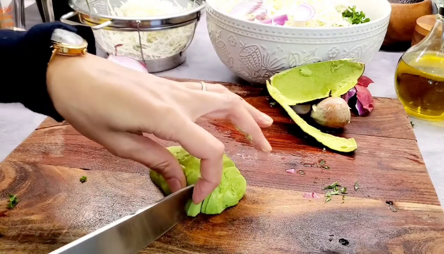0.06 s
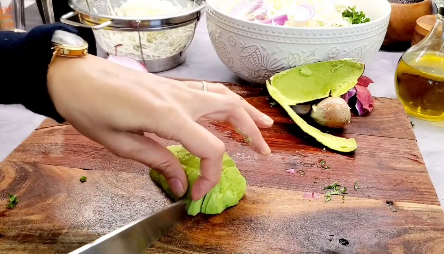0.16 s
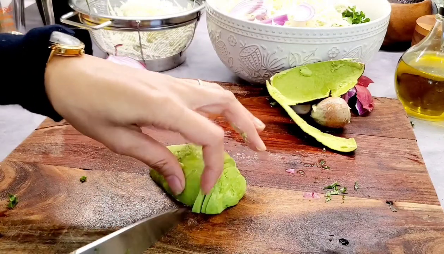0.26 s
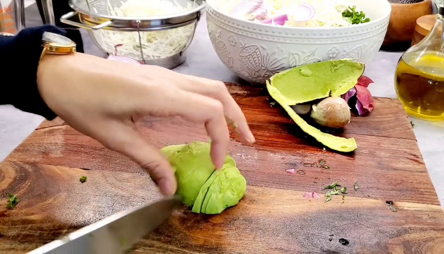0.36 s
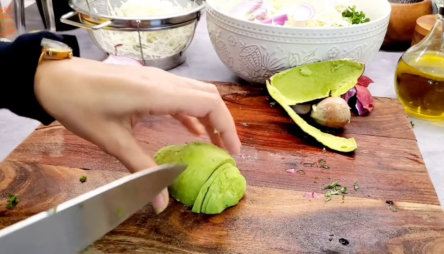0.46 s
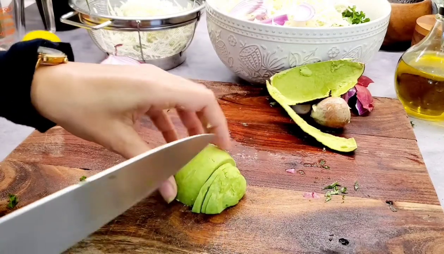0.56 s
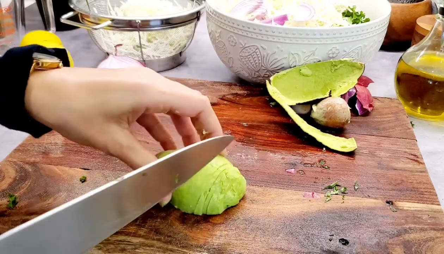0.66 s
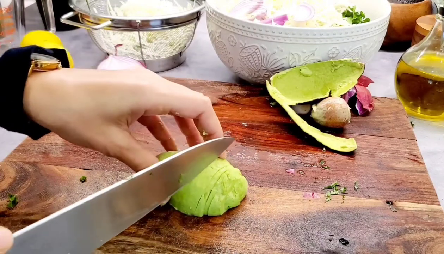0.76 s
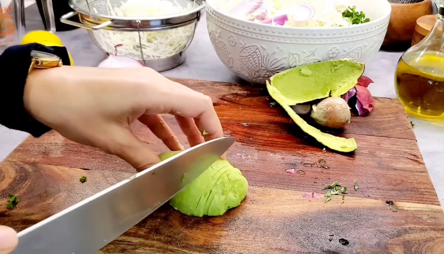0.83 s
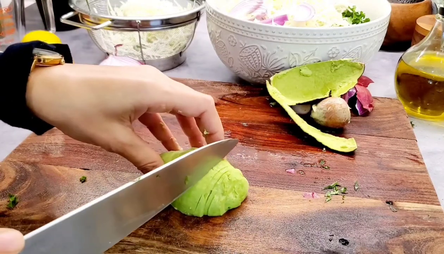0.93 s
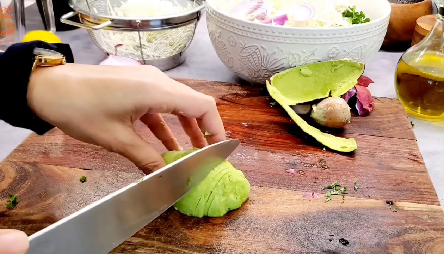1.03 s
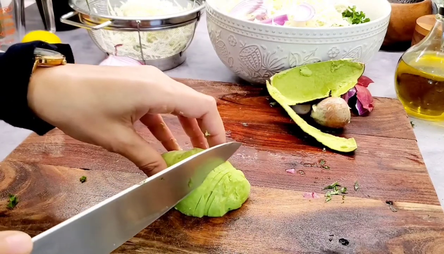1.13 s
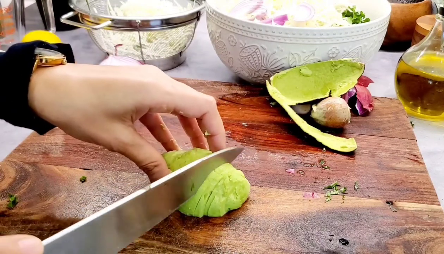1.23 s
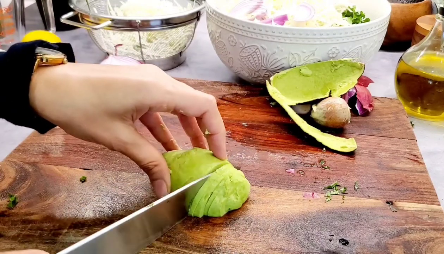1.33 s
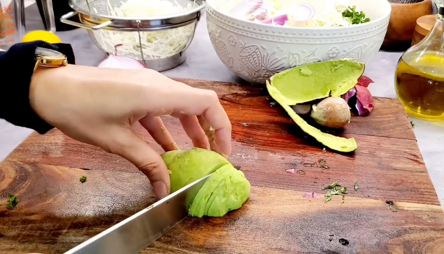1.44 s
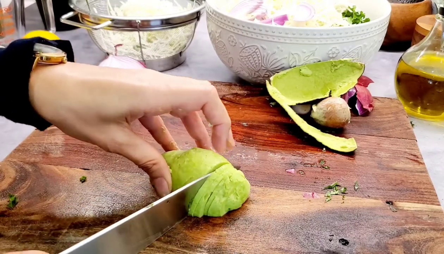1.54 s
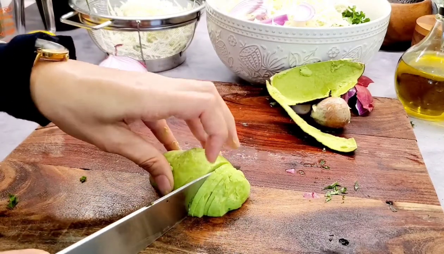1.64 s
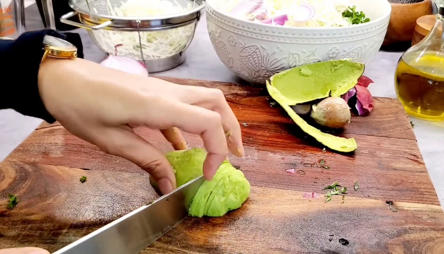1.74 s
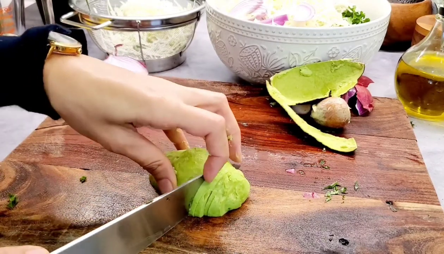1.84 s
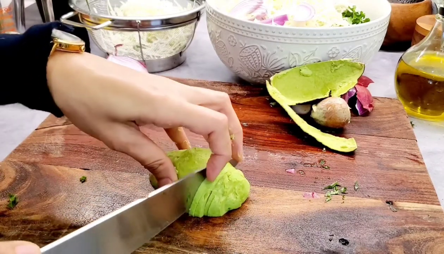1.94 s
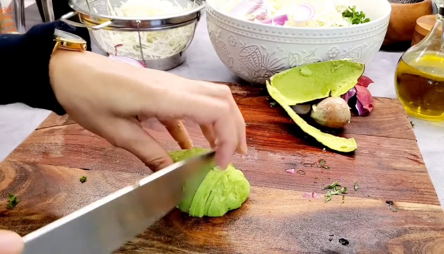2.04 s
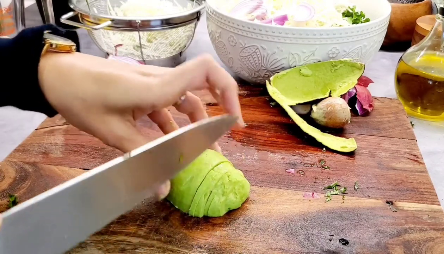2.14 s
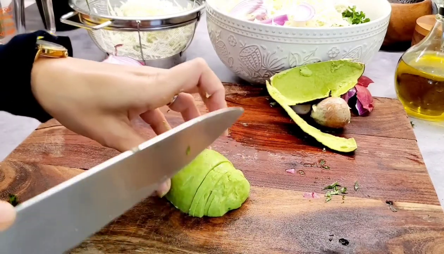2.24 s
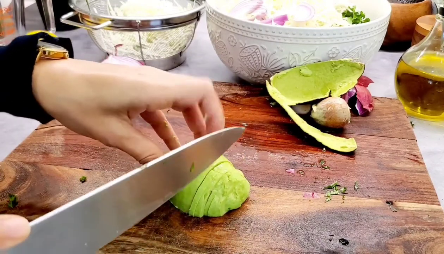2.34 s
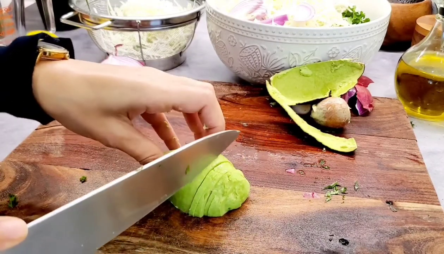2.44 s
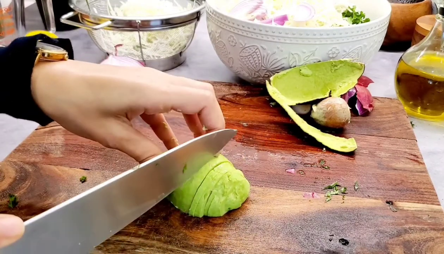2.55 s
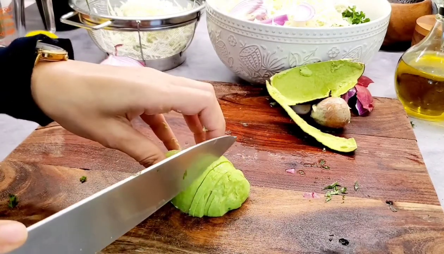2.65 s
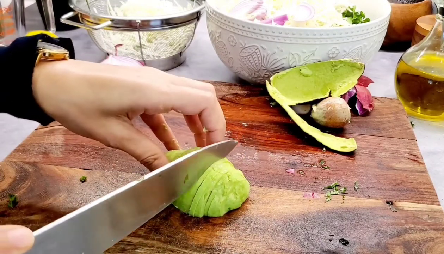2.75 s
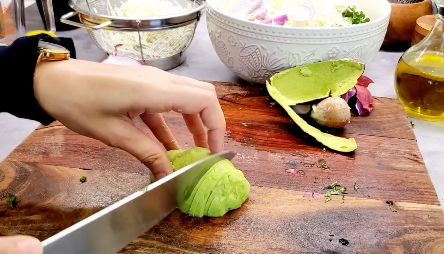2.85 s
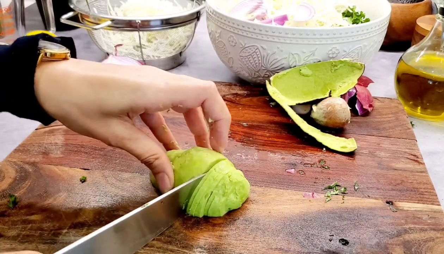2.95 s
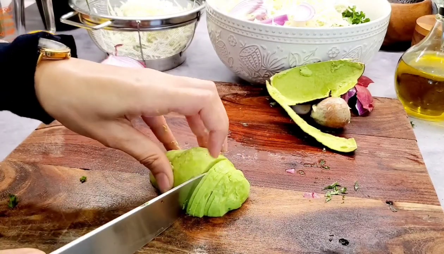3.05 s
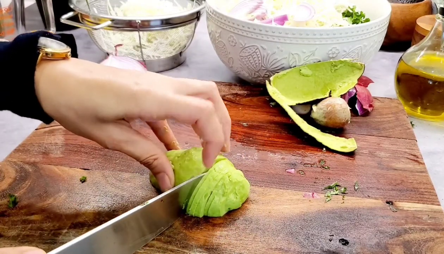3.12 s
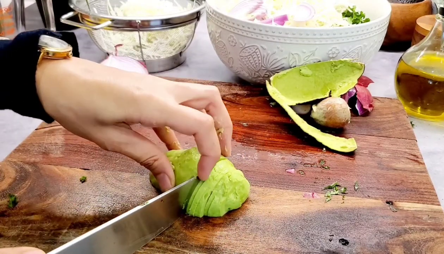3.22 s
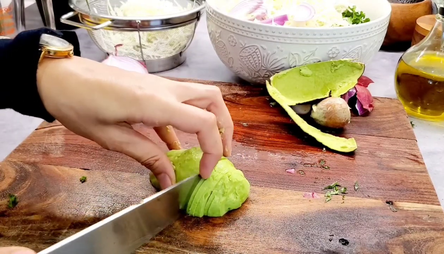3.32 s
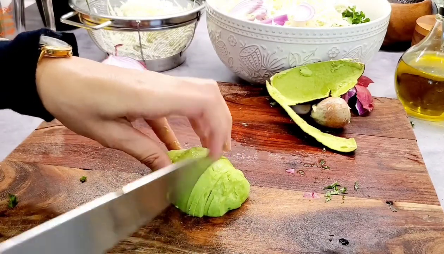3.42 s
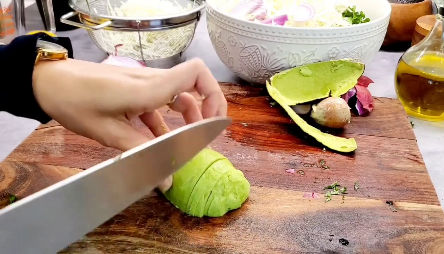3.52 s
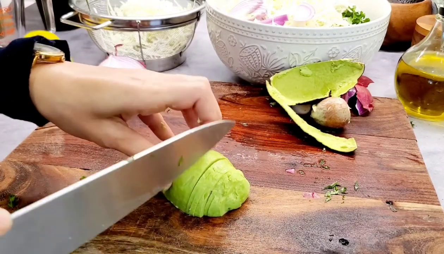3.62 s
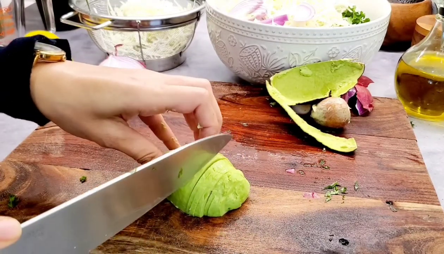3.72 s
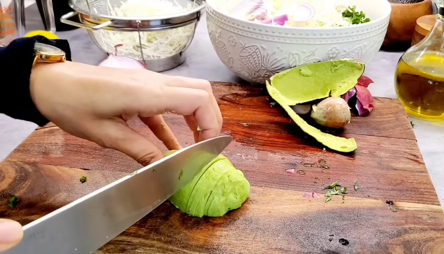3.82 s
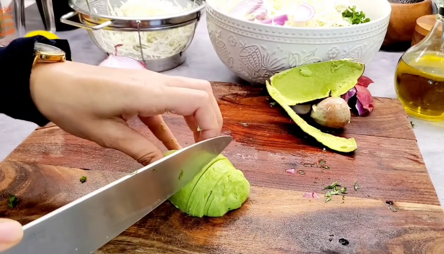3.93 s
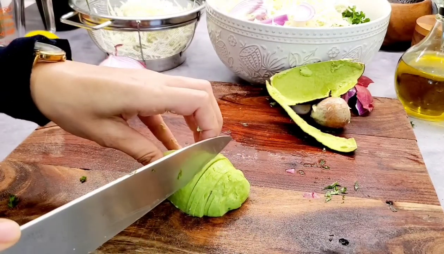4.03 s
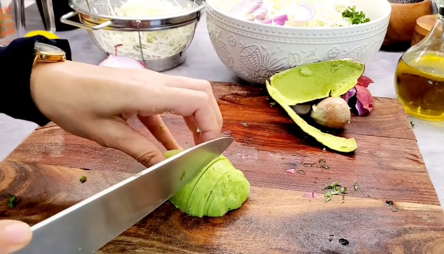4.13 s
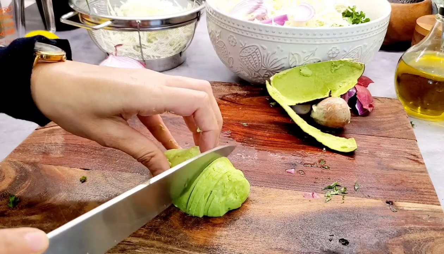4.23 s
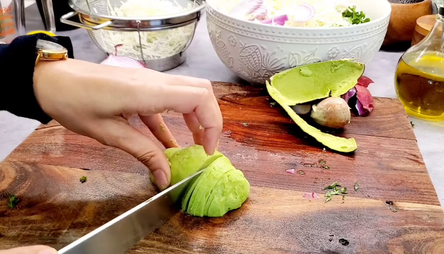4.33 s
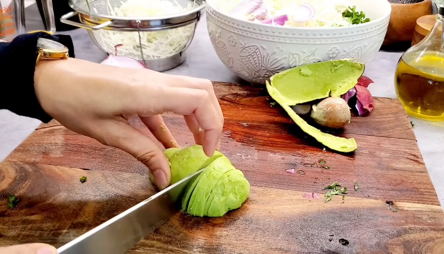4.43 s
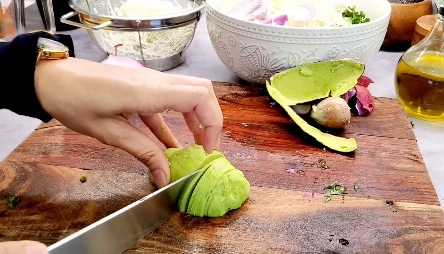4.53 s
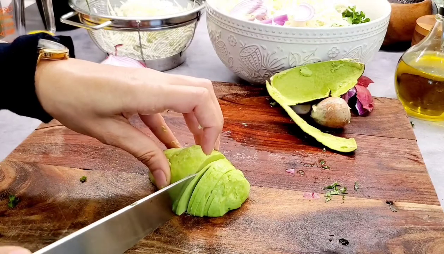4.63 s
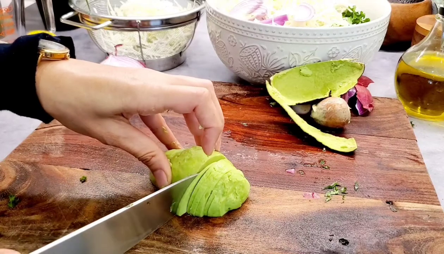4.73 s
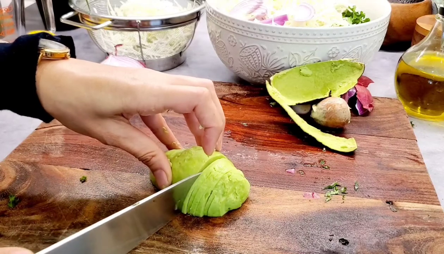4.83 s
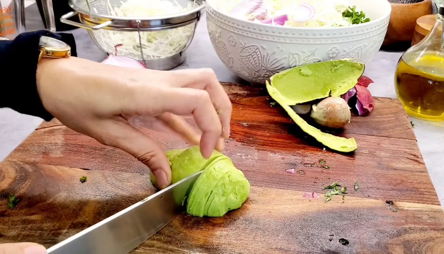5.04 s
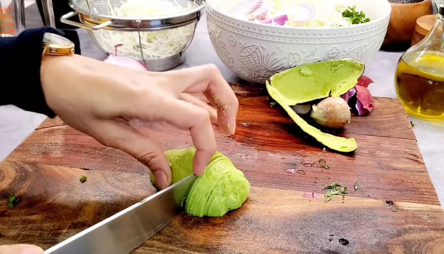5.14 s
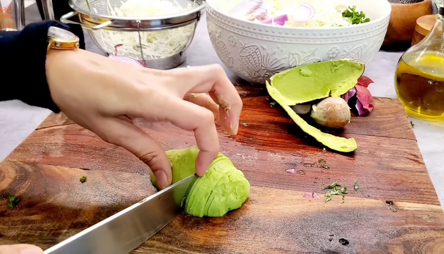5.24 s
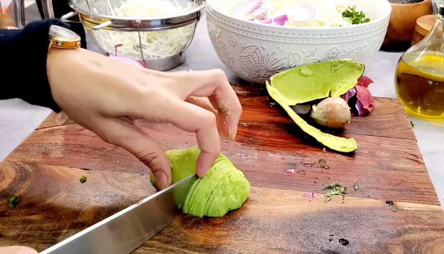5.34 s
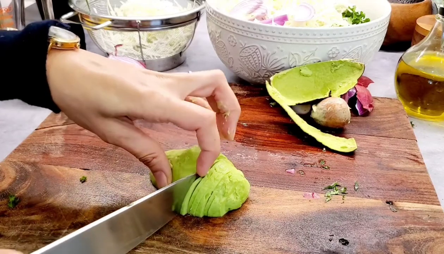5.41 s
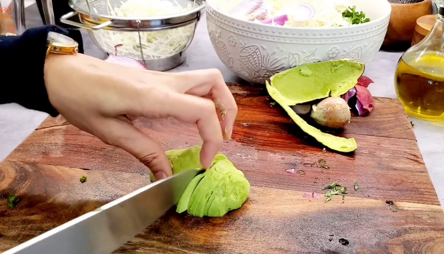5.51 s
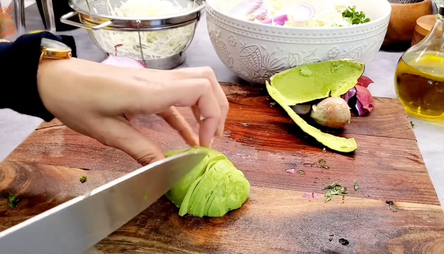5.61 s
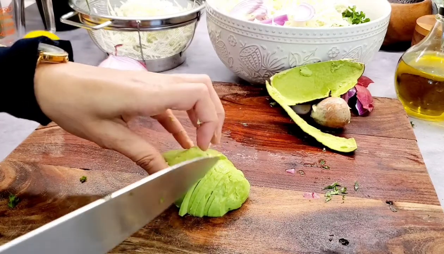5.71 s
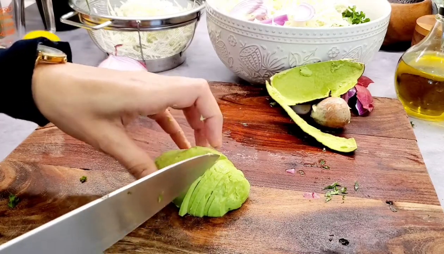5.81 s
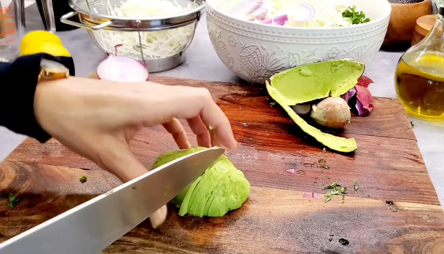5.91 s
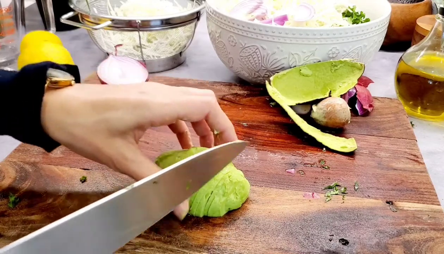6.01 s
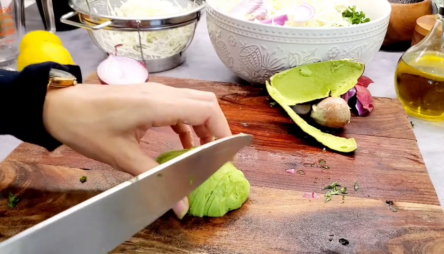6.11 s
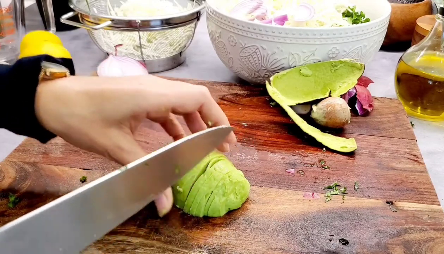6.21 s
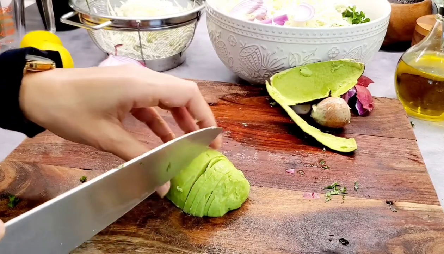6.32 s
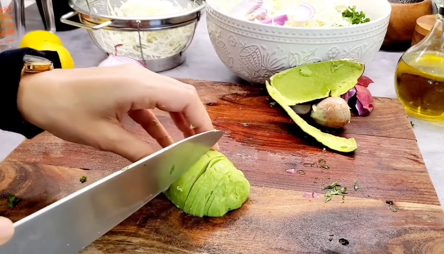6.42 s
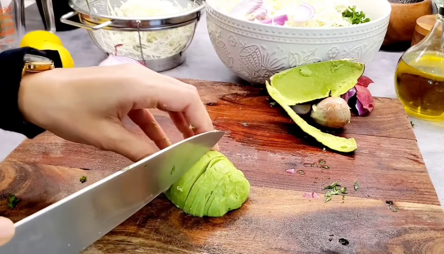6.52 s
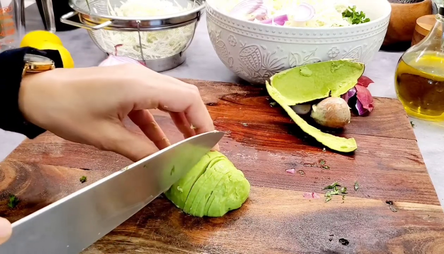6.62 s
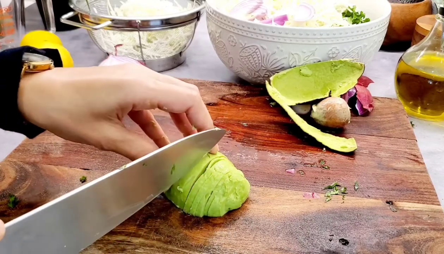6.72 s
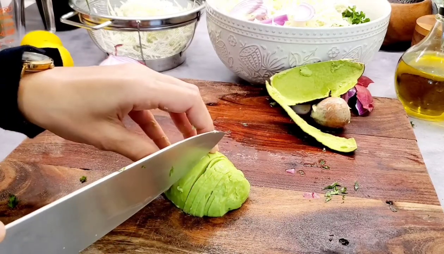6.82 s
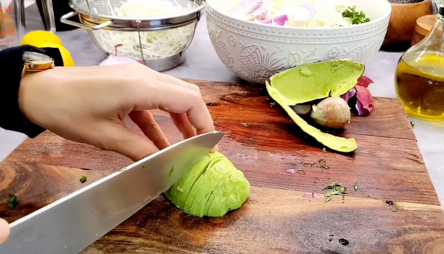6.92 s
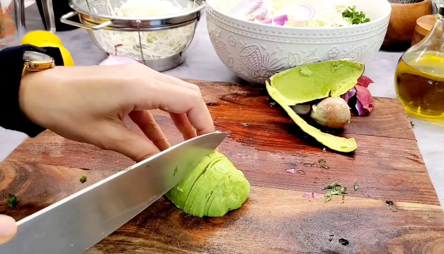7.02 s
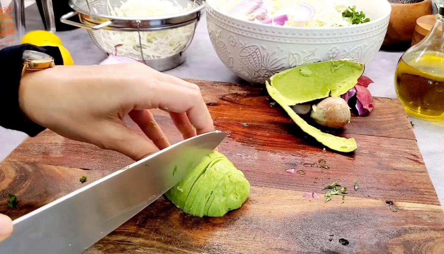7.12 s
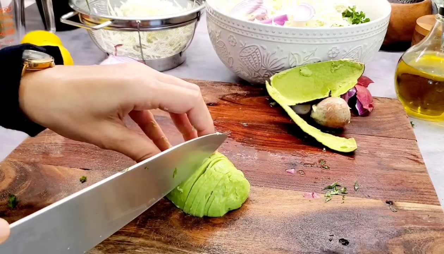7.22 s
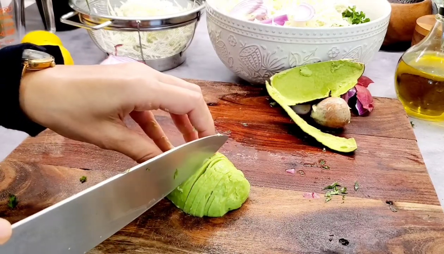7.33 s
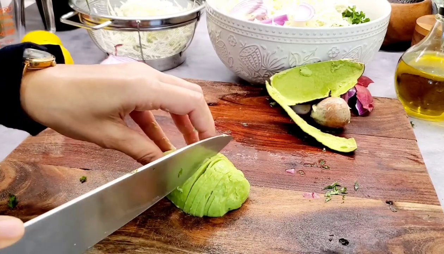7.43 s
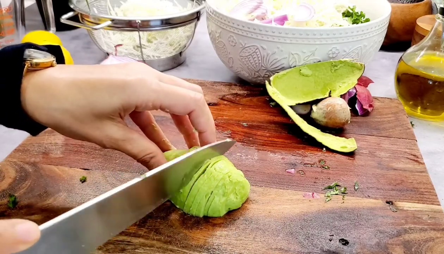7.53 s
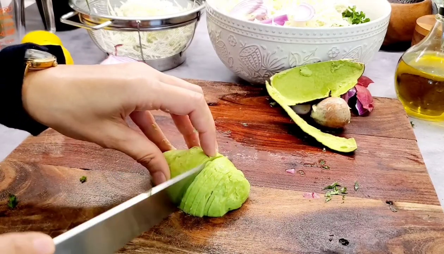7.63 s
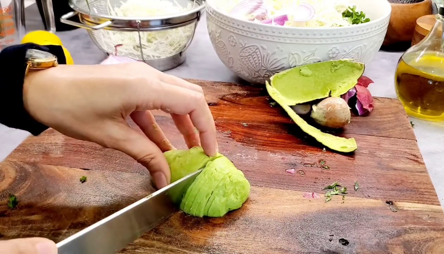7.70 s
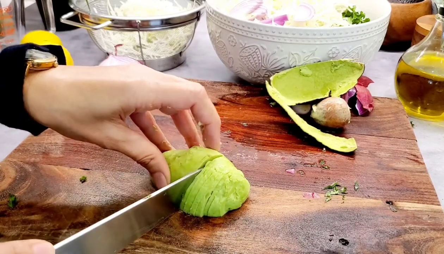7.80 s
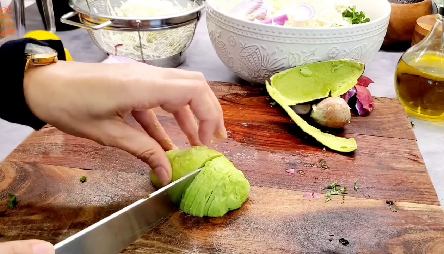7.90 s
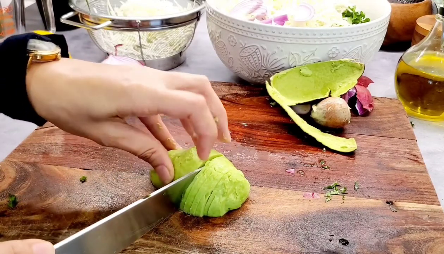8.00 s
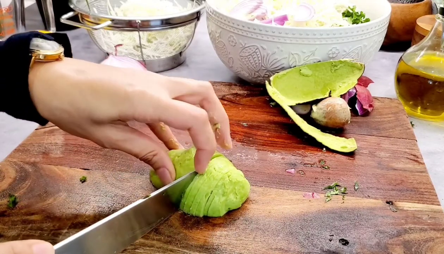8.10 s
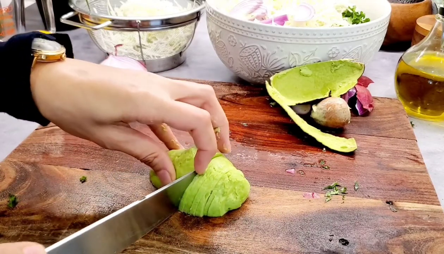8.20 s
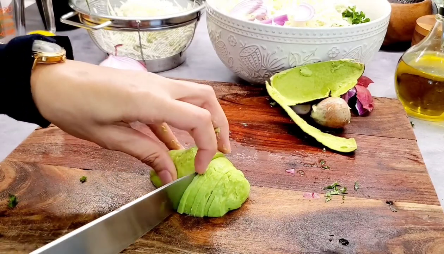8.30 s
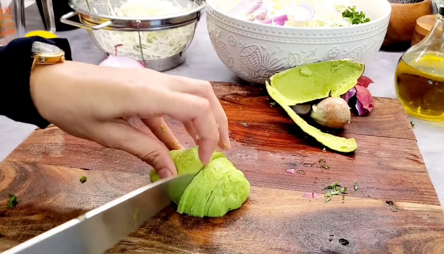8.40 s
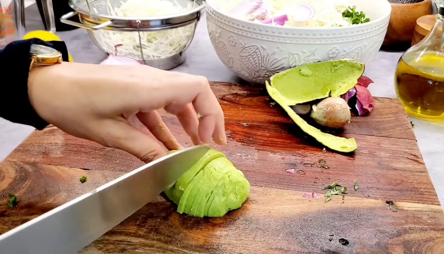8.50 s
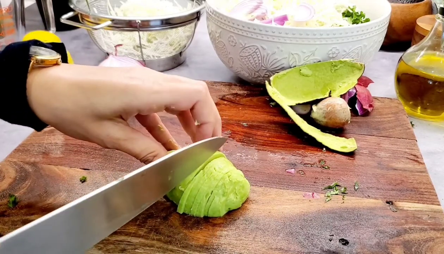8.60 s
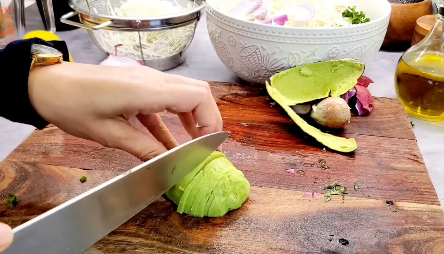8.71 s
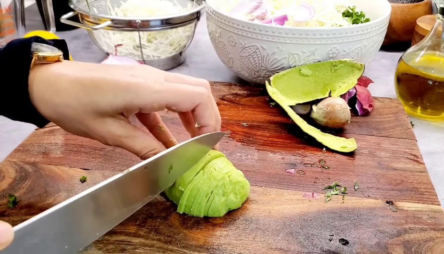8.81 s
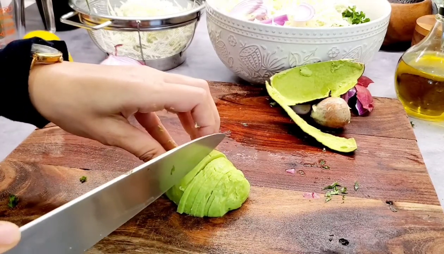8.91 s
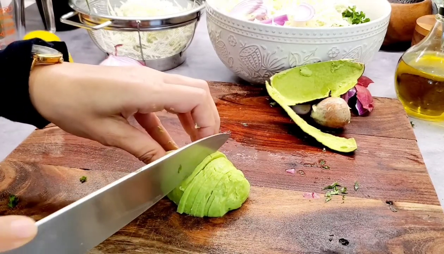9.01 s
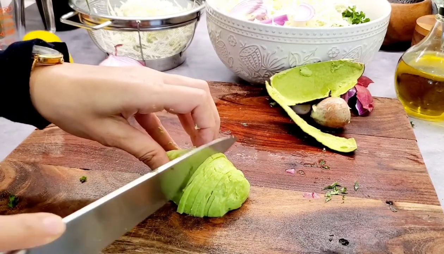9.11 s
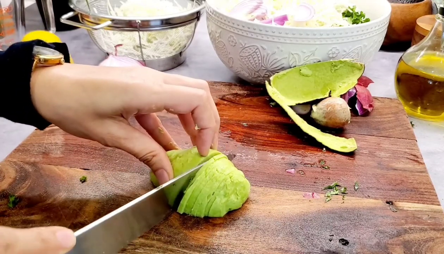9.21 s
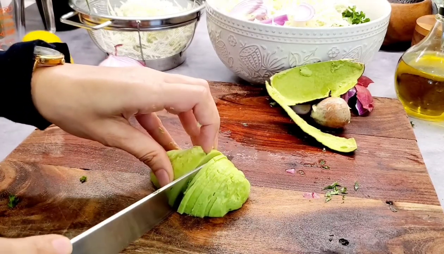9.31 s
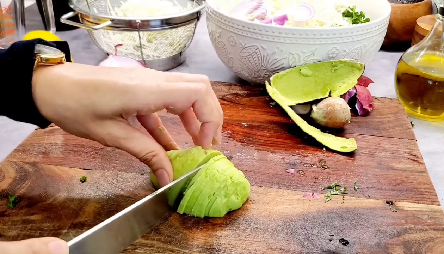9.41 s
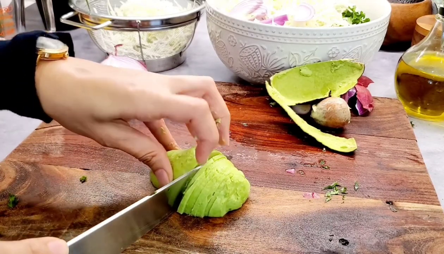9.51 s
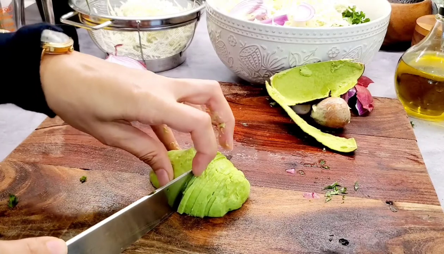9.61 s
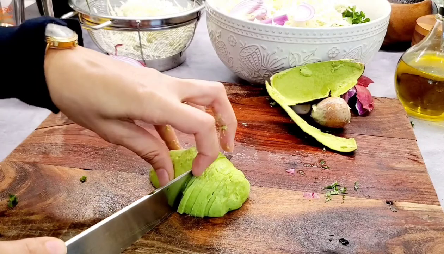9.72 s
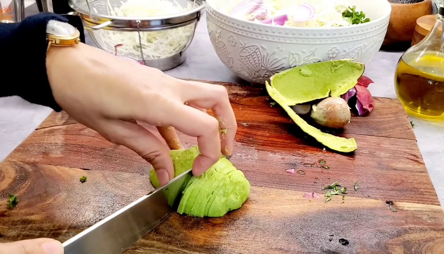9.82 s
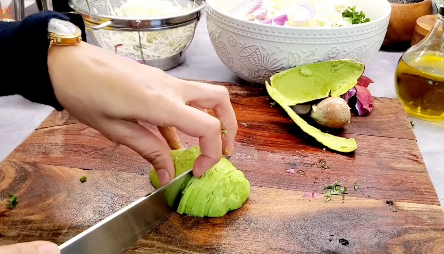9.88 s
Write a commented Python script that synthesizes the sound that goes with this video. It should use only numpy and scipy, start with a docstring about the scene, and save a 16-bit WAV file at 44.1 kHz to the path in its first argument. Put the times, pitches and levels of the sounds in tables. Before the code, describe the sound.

A kitchen knife cuts soft avocado on a wooden board, heard close up in stereo in a small kitchen. The edge scrapes lightly over the wood at the start, followed by a wet tick at 0.5 seconds and a faint moist rub. Short wooden knocks, each with a slight counter thump and a brief room echo, land at 1.4, 3.0 and 4.4 seconds, the second one the sharpest. The steel gives a faint thin ring at 2.2 seconds, and a moist slicing rasp leads into the third knock. From about 4.7 to 6.3 seconds a sleeve rustles in soft bursts, with a very light tap near 4.9 and another dull cut near 6.2. Two slightly softer knocks follow at 7.7 and 9.2 seconds. A quiet appliance hum with a faint whine and dull room noise continues throughout.

```python
"""Knife on a cutting board

A kitchen knife cuts soft fruit with moist friction and knocks on a wooden board, ringing board,
counter and steel in a small kitchen. The edge drags over the grain and ticks as it leaves the fruit;
a light touch rings the blade. A sleeve rustles in bursts. An appliance hums and whines under dull
room noise. Two spaced microphones."""
import sys
import numpy as np
from scipy import signal
from scipy.fft import rfft, irfft
from scipy.io import wavfile

SR = 44100
rng = np.random.default_rng(int(sys.argv[2]) if len(sys.argv) > 2 else 0)


def master_out(mix):
    """Clip the mix to full scale and print it as 16-bit PCM to the path in sys.argv[1]."""
    frames = np.transpose(np.atleast_2d(mix))
    ceiling = np.clip(frames, -1, 1)
    pcm = np.round(ceiling * 32767).astype(np.int16)
    wavfile.write(sys.argv[1], SR, pcm)


N = 438794
TIME_S = np.arange(N) / SR

# Wooden board: (frequency [Hz], left gain, right gain, t60 [s])
BOARD_MODES = [(371, -.04, -0.0075, 0.033), (582, -0.15, -0.13, 0.17), (609.6, -0.051, -.15, 0.075),
               (645, 0.1, 0.25, .055), (743, 0.12, 0.33, 0.083), (934.5, .27, -0.31, 0.014),
               (1057, .06, -0.54, 0.071), (1140, 0.82, 2.1, 0.0081), (1375, 0.6, 0.2, .015)]
# Stiff upper modes, woken by hard blows: (frequency [Hz], left gain, right gain, t60 [s])
UPPER_MODES = [(1570, 1.2, -0.26, .02), (2000, -0.69, -.6, 0.025), (2230, 0.99, -1.1, 0.014),
               (2375, -0.95, -1.2, 0.035), (2824, 0.76, 0.55, 0.011), (3440, -0.48, -0.41, 0.018),
               (3732, 0.14, .4, 0.033), (4379, -.08, 0.25, 0.0097)]
# Low bending modes of the blade: (frequency [Hz], left gain, right gain, t60 [s])
STEEL_MODES = [(1830, 0.97, .9, 0.075), (1855, 0.037, 0.11, 0.5), (2280, 0.15, 0.18, 0.066),
               (3983, 0.14, .1, 0.075), (4840, .03, 0.017, 0.068)]
# Snap of the edge: (frequency [multiple of centre], relative density [dB])
SNAP_SPECTRUM = [(.4, -20), (.7, -7.5), (1, 3.5), (1.4, -6), (2.2, -16), (3.0, -14)]


def impact(hardness_db, snap_db, snap_hz, contact_s, size):
    """One blow: the edge snaps, board and steel ring. A small board radiates no bass."""
    snap = stereo_noise(np.array(SNAP_SPECTRUM) * [snap_hz, 1], size)
    snap *= amp(snap_db) * decay(size, t60_s=0.018)
    board = strike(BOARD_MODES, size, contact_s)
    upper = amp(hardness_db) * strike(UPPER_MODES, size, contact_s=0.00023)
    steel = amp(5 + 1.29 * hardness_db) * strike(STEEL_MODES, size, contact_s=0.000067)
    low_cut = signal.butter(2, 300, "high", fs=SR, output="sos")
    return signal.sosfilt(low_cut, board + upper + steel) + snap


# Counter under the board: (frequency [Hz], left gain, right gain, t60 [s])
COUNTER_MODES = [(78, 1.8, 1.8, 0.14), (173, 0.68, 0.67, 0.03), (254.1, 0.54, 1.2, 0.023)]
# Early echoes off nearby surfaces and a far wall: (delay [s], left gain, right gain)
EARLY_ECHOES = [(.0012, -0.96, 0.28), (.0064, -0.058, .5), (.0112, .25, .3), (.018, -0.059, 0.18),
                (.0345, 0.049, .12)]
# Blade meets board:
# (time [s], level [dB], hardness [dB], relative snap [dB], snap centre [Hz], contact [s])
BOARD_KNOCKS = [(1.3916, -3.5, -21.5, -46.5, 8450, 0.00052), (2.9852, -4.5, -16.5, -42, 5280, 0.00041),
                (4.3673, -3.5, -24.5, -49.5, 7420, 0.00061), (4.9457, -25, -34, -48, 6000, 0.0018),
                (7.724, -6, -27.5, -51, 6800, 0.00075), (9.2479, -6, -33.5, -51.5, 5660, 0.00074)]


def knocks(thump_db=-40.5, thump_db_per_ms=7.5, rebound_s=0.021, rebound_db=-1.5):
    """Each blow shakes the counter, the board rocks back onto it, and the room answers."""
    out, size = np.zeros((2, N + SR)), SR // 3
    for time_s, level_db, hardness_db, snap_db, snap_hz, contact_s in BOARD_KNOCKS:
        blow = amp(level_db) * impact(hardness_db, snap_db, snap_hz, contact_s, size)
        thump = amp(thump_db_per_ms * contact_s * 1000) * strike(COUNTER_MODES, size, contact_s=0.0061)
        rebound = amp(rebound_db) * strike(COUNTER_MODES[1:], size, contact_s=0.003)
        counter_gain = amp(level_db + thump_db)
        add_at(out, time_s, blow + counter_gain * thump)
        add_at(out, time_s, counter_gain * rebound, rebound_s)
        for delay_s, left, right in EARLY_ECHOES:
            add_at(out, time_s, blow[0] * [[left], [right]], delay_s)
        burst = blow[:1] * decay(size, t60_s=0.012)  # mostly the first burst reaches the walls
        room = kitchen_response()  # new for each spot on the board
        add_at(out, time_s, signal.fftconvolve(room, burst, axes=1))
    return out[:, :N]


# Dull friction and rasp of the edge: (frequency [Hz], relative density [dB])
CUT_SPECTRUM = [(250, -32), (450, 2.5), (800, -4), (1250, -3), (1600, -15), (3000, -43.5)]
RASP_SPECTRUM = [(1200, -22.5), (1550, -3), (1900, 1), (2350, -9), (2800, -19.5), (3700, -18), (6000, -24),
                 (8500, -30), (10000, -53), (15000, -42.5)]
# Blade rubs fruit and wood: (time [s], hold [s], level [dB], relative rasp [dB])
CUT_STROKES = [(.7, .05, -60, -12.5), (4.21, .1, -51.5, -3), (4.345, .015, -53, -6.5),
               (6.225, .09, -54.5, -16)]


def cuts(rise_db_per_s=560, fall_db_per_s=350):
    """Moist friction: dull dense grains, with a finer rasp of the edge on top."""
    body = stereo(grains(per_s=9000, spread_db=3.5), CUT_SPECTRUM)
    rasp = stereo(grains(per_s=11000, spread_db=0), RASP_SPECTRUM)
    return sum(stroke(time_s, hold_s, db, rise_db_per_s, fall_db_per_s) * (body + amp(rasp_db) * rasp)
               for time_s, hold_s, db, rasp_db in CUT_STROKES)


# Resonances of the dragged blade: (frequency [Hz], width [Hz], level [dB])
DRAG_RESONANCES = [(2160, 410, 5.5), (3130, 34, 2), (3270, 100, -5), (3970, 69, 5.5), (4770, 61, -2),
                   (6550, 155, -0.5), (7540, 1375, -13), (9060, 90, 0), (10300, 122, -6), (11700, 90, 0),
                   (12800, 90, -6), (13200, 125, -6), (14100, 170, -3), (15200, 95, -4)]
# Edge dragged over the wood: (time [s], hold [s], level [dB])
DRAG_STROKES = [(.15, 0.1, -56)]


def drag(rise_db_per_s=150, sheen_rise_db_per_s=260, fall_db_per_s=300, sheen_lag_s=0.022):
    """Wood grain catches the edge in dense clicks that drive blade and board."""
    catches = stereo(grains(per_s=2500, spread_db=2), [(500, -3.5), (1500, -9.5), (16000, 7)])
    blade = sum(amp(level_db) * resonance(catches, hz, width_hz) * (-1) ** k
                for k, (hz, width_hz, level_db) in enumerate(DRAG_RESONANCES))
    board = unit_rms(sum(left * ring(catches, hz, t60_s) for hz, left, _, t60_s in BOARD_MODES))
    body = power_sum(stroke(time_s, hold_s, db, rise_db_per_s, fall_db_per_s)
                     for time_s, hold_s, db in DRAG_STROKES)
    sheen = power_sum(stroke(time_s + sheen_lag_s, hold_s, db - 5, sheen_rise_db_per_s, fall_db_per_s)
                      for time_s, hold_s, db in DRAG_STROKES)
    scrape = two_bands(blade + amp(-15) * catches, body, sheen, split_hz=7900)
    return scrape + amp(1) * body * board


# Tick noise: (frequency [Hz], relative density [dB])
TICK_SPECTRUM = [(2500, -13), (5000, -9), (9000, -12), (15000, -1.5)]
# Edge releases: (time [s], level [dB], t60 [s])
EDGE_TICKS = [(0.537, -55.5, 0.15), (.755, -73, 0.035), (1.2645, -68, 0.078)]


def ticks():
    """The wet edge lets go of the fruit in sudden bright puffs."""
    envelope = sum(amp(level_db - 60 * np.maximum(TIME_S - time_s, 0) / t60_s) * (TIME_S >= time_s)
                   for time_s, level_db, t60_s in EDGE_TICKS)
    return envelope * stereo_noise(TICK_SPECTRUM)


# High modes of the blade: (frequency [Hz], level [dB], t60 [s])
BLADE_MODES = [(3110, -3.5, 0.19), (3741, -11, 0.13), (6000, -17, .1), (6800, -17, 0.16), (7817, -19, 0.32),
               (8893, -30, .25), (11310, -22, 0.15), (12770, -28, 0.15), (15040, -36, 0.19)]
# Light touches: (time [s], level [dB])
BLADE_TOUCHES = [(2.221, -57)]


def blade_ting():
    """A light touch rings the steel in thin high modes."""
    clicks = np.zeros(N)
    for time_s, level_db in BLADE_TOUCHES:
        clicks[round(time_s * SR)] = amp(level_db)
    ringing = sum(amp(level_db) * ring(clicks, hz, t60_s) for hz, level_db, t60_s in BLADE_MODES)
    return ringing * amp([[0.5], [-0.5]])


# Sliding cloth: (frequency [Hz], relative density [dB])
SLEEVE_SPECTRUM = [(1180, -21.5), (2000, -17), (2210, -23), (2690, -5), (3700, -10.5), (4240, -4.5),
                   (4650, -10), (5690, -0.5), (6510, -7.5), (7450, -5.5), (10900, -9.5), (12300, -5.5),
                   (15000, -8.5)]
# Swishes: (time [s], hold [s], level [dB], rise [dB/s], relative sheen [dB])
SLEEVE_SWISHES = [(4.68, 0.051, -60, 500, -5), (4.85, 0.041, -47.5, 169, -7.5),
                  (5.07, 0.037, -53.5, 150, -4.5), (5.33, .03, -60.5, 200, -10),
                  (5.48, 0.11, -55.5, 241, -6.5), (5.97, 0.042, -63, 250, -19.5),
                  (6.165, 0.076, -59, 259, -13)]


def sleeve(body_fall_db_per_s=66, sheen_fall_db_per_s=105):
    """Fibres slide in fine grains; the sheen dies faster than the body of each swish."""
    fibres = stereo(grains(per_s=9150, spread_db=1.46), SLEEVE_SPECTRUM) * amp(1.8 * drift(15))
    body = power_sum(stroke(time_s, hold_s, db, rise, body_fall_db_per_s)
                     for time_s, hold_s, db, rise, _ in SLEEVE_SWISHES)
    sheen = power_sum(stroke(time_s, hold_s, db + sheen_db, rise, sheen_fall_db_per_s)
                      for time_s, hold_s, db, rise, sheen_db in SLEEVE_SWISHES)
    return two_bands(fibres, body, sheen, split_hz=9000)


# Reverberation bands: (frequency [Hz], t60 [s], level [dB])
REVERB_BANDS = [(178, 0.41, -20.5), (361.1, 0.29, -25), (514, .3, -22), (821.4, 0.42, -23),
                (1091, 0.36, -22.5), (1510, 0.24, -19), (1999, 0.35, -20), (2680, 0.16, -15.5),
                (3703, 0.26, -17.5), (4870, 0.19, -23.5), (7350, .15, -22)]


def kitchen_response(swell_s=0.0022):
    """Stereo impulse response: noise bands swell in and die, each at its own rate."""
    time_s = np.arange(SR // 2) / SR
    white = stereo_noise([(20, 0), (20000, 0)], len(time_s))
    out = 0
    for hz, t60_s, level_db in REVERB_BANDS:
        band = signal.butter(2, [hz / 1.2, hz * 1.2], "band", fs=SR, output="sos")
        out += signal.sosfilt(band, white) * amp(level_db) * decay(len(time_s), t60_s)
    return out * (1 - np.exp(-(time_s / swell_s) ** 2))


# Appliance tones: (frequency [Hz], rms level [dB])
HUM_TONES = [(59.2, -65.5), (118.4, -63), (250, -69), (473.7, -71.5), (597.5, -77), (710.6, -74.5),
             (1179, -78), (3300, -88), (3537, -95.5), (3655, -85), (4126, -87), (5658, -101)]


def appliance_hum():
    """Tones waver in level and slightly in pitch, reaching the microphones at different phases."""
    out = np.zeros((2, N))
    for hz, level_db in HUM_TONES:
        phase_rad = 2 * np.pi * np.cumsum(hz * (1 + 0.002 * drift(3))) / SR
        offset_rad = np.arccos(at_hz(MIC_COHERENCE, hz))
        out += np.sqrt(2) * amp(level_db + 2 * drift(4.3)) * np.sin(phase_rad + [[0], [offset_rad]])
    return out


# Room noise; appliance whirr with microphone hiss; appliance drone:
# (frequency [Hz], relative density [dB])
AIR_SPECTRUM = [(100, -38), (170, -8.5), (216, -9.5), (249, -4.5), (273, -4.5), (365, -8.5), (384, -15),
                (477, -12.5), (562, -15), (728, -13.5), (1120, -19.5), (1210, -21), (2000, -34),
                (2600, -68.5), (4400, -120)]
WHIRR_SPECTRUM = [(1180, -36.5), (2000, -3.5), (2810, -2.5), (3140, -8), (3540, -1), (3800, -7),
                  (3890, -11.5), (4200, -10), (4390, -11.5), (5820, -13.5), (8990, -27), (12000, -34),
                  (15400, -17)]
DRONE_SPECTRUM = [(30, -25), (50, -10), (60, -0.5), (74, -6), (88, -1.5), (98, -4), (107, -7), (120, -1.5),
                  (135, -2), (145, -7.5), (170, -13), (220, -54.5)]


def room_noise(air_db=-57, whirr_db=-75, drone_db=-59, waver_db=0.5):
    """Dull air and the appliance's whirr and drone, each wavering slightly."""
    air = amp(air_db + waver_db * drift(2)) * stereo_noise(AIR_SPECTRUM)
    whirr = amp(whirr_db + waver_db * drift(3)) * stereo_noise(WHIRR_SPECTRUM)
    drone = amp(drone_db + waver_db * drift(3)) * stereo_noise(DRONE_SPECTRUM)
    return air + whirr + drone


# Likeness of the two microphones: (frequency [Hz], correlation)
MIC_COHERENCE = [(40, .96), (130, .94), (290, .45), (640, -.33), (1410, -.47), (3100, -.12), (6820, 0),
                 (15000, 0)]
# Channel balance: (frequency [Hz], left minus right [dB])
MIC_BALANCE = [(60, -3), (180, 2), (550, -0.5), (1650, 0.5), (4970, -1.5), (15000, -1.5)]


def stereo(sources, spectrum):
    """Two unrelated signals become a coloured spaced-microphone pair of rms 1."""
    size = sources.shape[1]
    hz = np.maximum(np.arange(size // 2 + 1) * SR / size, 1)
    mid, side = rfft(sources)
    coherence = at_hz(MIC_COHERENCE, hz)
    channels = np.sqrt(1 + coherence) * mid + np.sqrt(1 - coherence) * side * [[1], [-1]]
    balance = amp(at_hz(MIC_BALANCE, hz) / 2 * [[1], [-1]])
    return unit_rms(irfft(channels * balance * amp(at_hz(spectrum, hz)), size))


def stereo_noise(spectrum, size=N):
    """Coloured Gaussian noise at both microphones."""
    return stereo(rng.standard_normal((2, size)), spectrum)


def grains(per_s, spread_db):
    """Two streams of dense uneven clicks."""
    heights = amp(spread_db * np.minimum(rng.exponential(1, (2, N)), 5))
    signs = rng.choice([-1, 1], (2, N))
    return heights * signs * (rng.random((2, N)) < per_s / SR)


def strike(modes, size, contact_s):
    """One smooth push rings a body in stereo, each mode at a slightly random level."""
    push = np.sin(np.pi * np.minimum(np.arange(size) / SR / contact_s, 1)) ** 2
    rings = [ring(push / push.sum(), hz, t60_s) for hz, _, _, t60_s in modes]
    gains = np.array(modes)[:, 1:3].T * amp(rng.normal(0, 0.6, len(modes)))
    return gains @ rings


def ring(x, hz, t60_s):
    """One mode: a unit click starts a decaying sine of height 1."""
    radius, step_rad = amp(-60 / (t60_s * SR)), 2 * np.pi * hz / SR
    return signal.lfilter([0, np.sin(step_rad)], [1, -2 * radius * np.cos(step_rad), radius ** 2],
                          x + 1e-18)


def resonance(x, hz, width_hz):
    """Band-pass of gain 1 at its centre."""
    radius = np.exp(-np.pi * width_hz / SR)
    feedback = [1, -2 * radius * np.cos(2 * np.pi * hz / SR), radius ** 2]
    return signal.lfilter(np.array([1, 0, -1]) * (1 - radius ** 2) / 2, feedback, x)


def two_bands(x, low_gain, top_gain, split_hz):
    """Normalise the bands below and above the split, then give each its own gain."""
    low = signal.sosfiltfilt(signal.butter(2, split_hz, fs=SR, output="sos"), x)
    return low_gain * unit_rms(low) + top_gain * unit_rms(x - low)


def stroke(time_s, hold_s, level_db, rise_db_per_s, fall_db_per_s):
    """Gain of one gesture: swells until time_s, holds, dies away."""
    before_s = np.maximum(time_s - TIME_S, 0)
    after_s = np.maximum(TIME_S - time_s - hold_s, 0)
    return amp(level_db - rise_db_per_s * before_s - fall_db_per_s * after_s)


def drift(rate_hz, steps_per_s=40):
    """Slow random wander of rms about 1."""
    steps = rng.standard_normal(int(N / SR * steps_per_s) + 2)
    pole = np.exp(-2 * np.pi * rate_hz / steps_per_s)
    wander = unit_rms(signal.lfilter([1], [1, -pole], steps))
    return np.interp(TIME_S * steps_per_s, np.arange(len(steps)), wander)


def decay(size, t60_s):
    """Exponential fade from 1."""
    return amp(-60 * np.arange(size) / SR / t60_s)


def add_at(out, time_s, sound, delay_s=0):
    """Mix a stereo sound in at time_s plus delay_s."""
    start = round(time_s * SR) + round(delay_s * SR)
    out[:, start:start + sound.shape[1]] += sound


def power_sum(gains):
    """Unrelated sounds add in power."""
    return np.sqrt(sum(gain ** 2 for gain in gains))


def at_hz(points, hz):
    """Interpolate on a log-frequency axis."""
    points_hz, values = np.array(points).T
    return np.interp(np.log(hz), np.log(points_hz), values)


def amp(db):
    """Decibels to gain."""
    return 10 ** (np.asarray(db) / 20)


def unit_rms(x):
    """Scale to rms 1."""
    return x / np.sqrt(np.mean(x ** 2) + 1e-30)


def scene():
    """All sources at the two microphones."""
    knife = knocks() + blade_ting() + ticks() + drag() + cuts()
    return knife + sleeve() + room_noise() + appliance_hum()


def record(dry, low_cut_hz=36, high_cut_hz=15400):
    """The microphones drop the deepest bass; the top is cut steeply."""
    low_cut = signal.butter(4, low_cut_hz, "high", fs=SR, output="sos")
    high_cut = signal.ellip(10, 0.5, 70, high_cut_hz, fs=SR, output="sos")
    return signal.sosfilt(high_cut, signal.sosfilt(low_cut, dry))


dry = scene()
out = record(dry)
master_out(out)
```